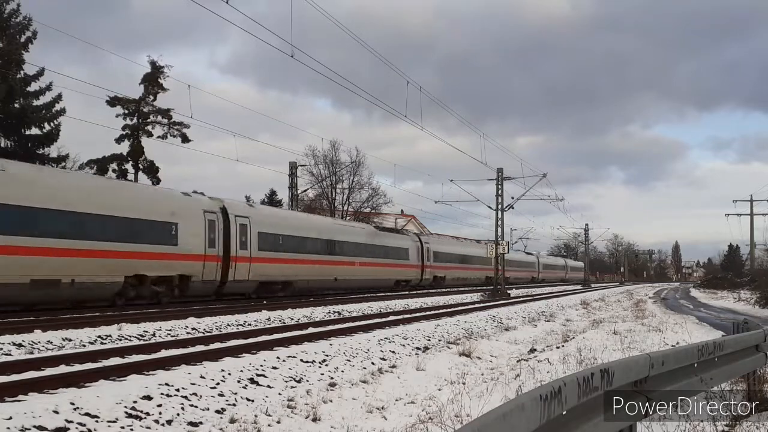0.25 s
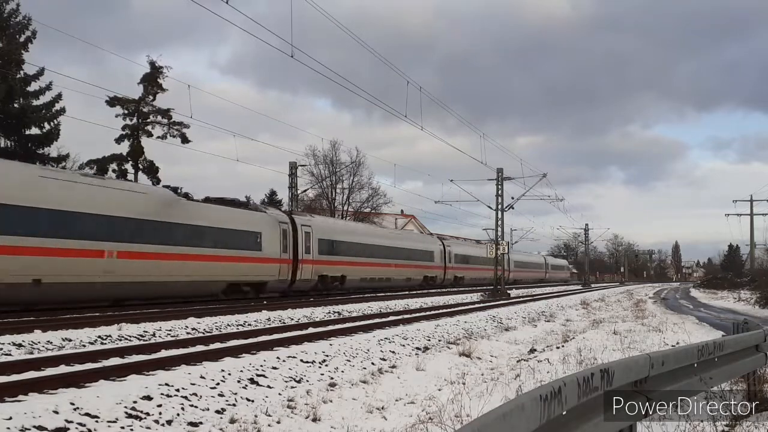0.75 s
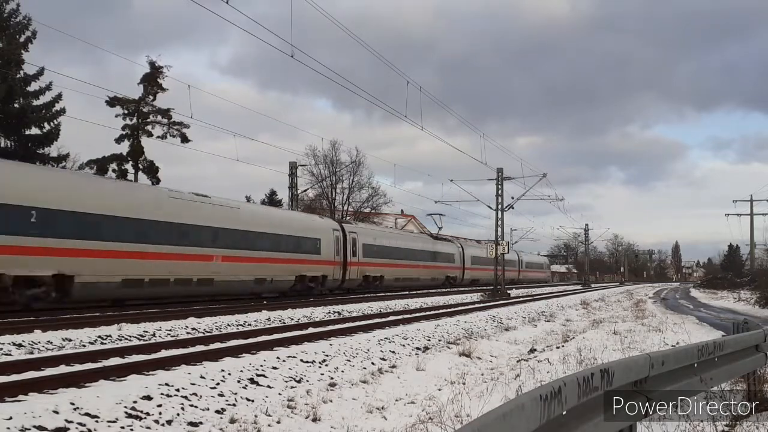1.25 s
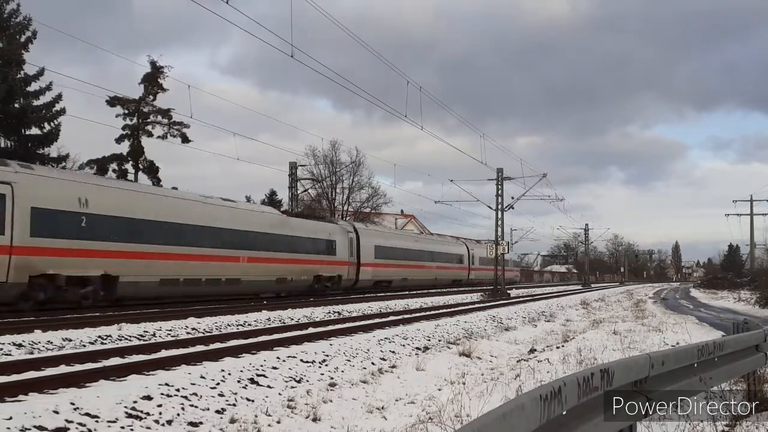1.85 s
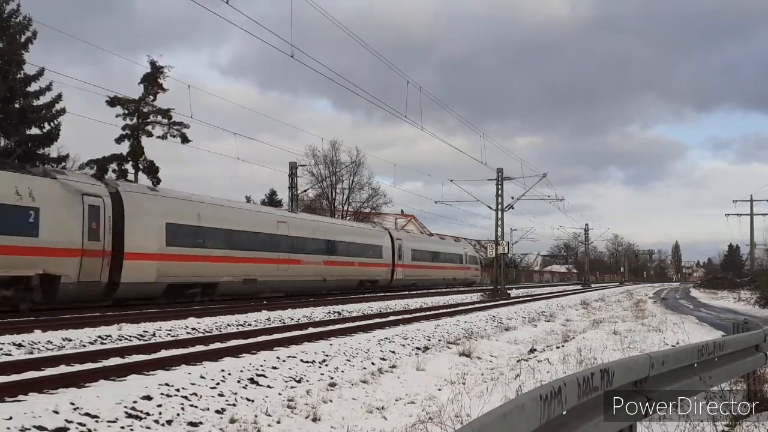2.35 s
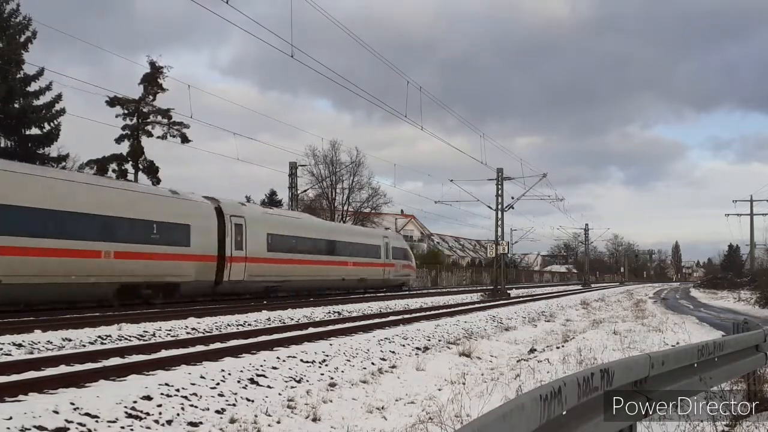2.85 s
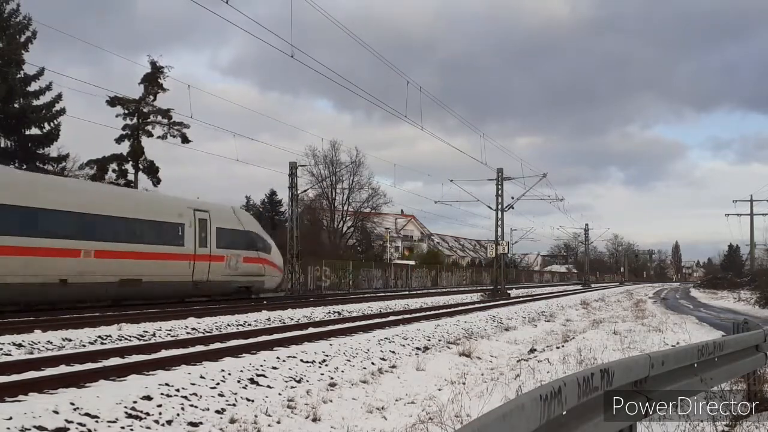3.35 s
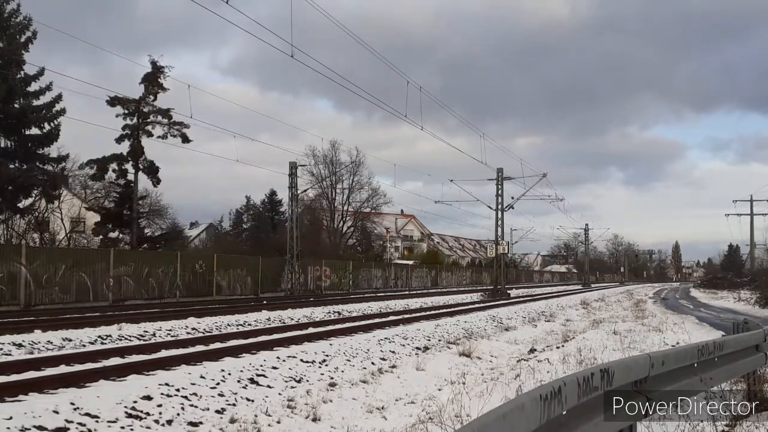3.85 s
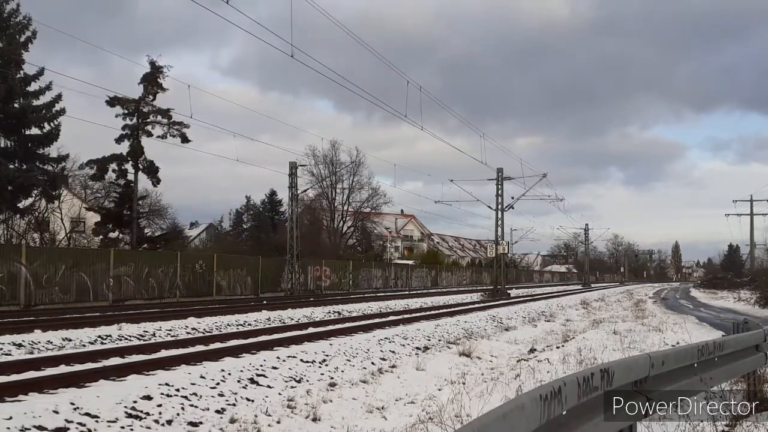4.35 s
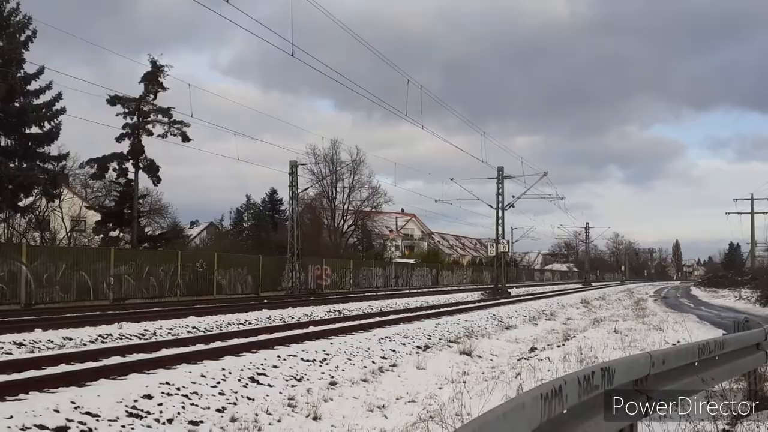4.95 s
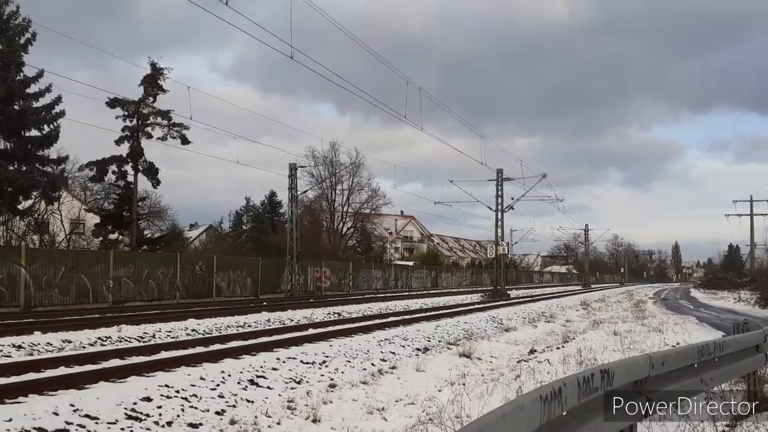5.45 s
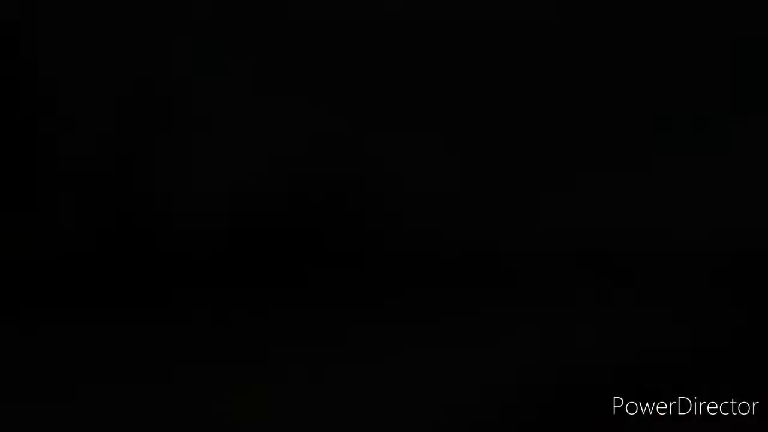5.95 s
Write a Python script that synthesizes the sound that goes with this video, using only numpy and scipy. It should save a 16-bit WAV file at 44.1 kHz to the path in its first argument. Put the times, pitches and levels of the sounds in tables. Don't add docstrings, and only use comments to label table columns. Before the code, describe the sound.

A fast passenger train roars past close by on outdoor tracks, wheels ringing, then its rush drops away into wind thumps and brief silence.

```python
import sys
import numpy as np
from scipy import signal
from scipy.io import wavfile
from scipy.ndimage import uniform_filter1d

SR = 44100
rng = np.random.default_rng(int(sys.argv[2]) if len(sys.argv) > 2 else 0)


def volts_from_db(level):
    exponent = np.asarray(level, float) / 20
    return 10 ** exponent


def persist_wave(psi):
    counts = np.round(np.clip(psi, -1, 1) * 32767).astype(np.int16)
    wavfile.write(sys.argv[1], SR, np.atleast_2d(counts).T)


N = 273728
FRAME, HOP = 2048, 512
HZ = np.fft.rfftfreq(FRAME, 1 / SR)[:, None]
TIMES = (np.arange(N // HOP + 9) - 3) * HOP / SR
PORT_LAG_S = 22 / SR
CUT_S, RESUME_S, END_S = 5.9128, 6.0664, 6.2068


def evened(x):
    return x / np.sqrt(np.mean(x ** 2) + 1e-20)


def over_hz(table):
    hz, *columns = np.transpose(table)
    return np.array([np.interp(np.log(HZ + 1), np.log(hz + 1), c) for c in columns])


def over_time(table):
    s, *columns = np.transpose(table)
    return np.array([np.interp(TIMES, s, c) for c in columns])


def bump(hz, width_hz):
    return np.exp(-.5 * ((HZ - hz) / width_hz) ** 2)


def swells(events, width_s):
    return sum(db * np.exp(-.5 * ((TIMES - s) / width_s) ** 2) for s, db in events)


def two_ports(level_db, alike, lead, steady=.95):
    a, b, c, d = rng.standard_normal((len(TIMES), len(HZ), 4)).T
    alike = np.clip(alike, 0, 1)
    left = a + 1j * b
    lumps = uniform_filter1d(abs(left) ** 2 / 2, size=5, axis=0)
    lumps = uniform_filter1d(lumps, size=7, axis=1)
    left = left / lumps ** (steady / 2)
    right = alike * left + np.sqrt(1 - alike ** 2) * (c + 1j * d)
    right = right * np.exp(-1j * lead)
    spectra = np.array([left, right]) * volts_from_db(level_db) * np.sqrt(SR / FRAME * .6)
    sound = signal.istft(spectra, nperseg=FRAME, noverlap=FRAME - HOP)[1]
    return sound[:, 3 * HOP:][:, :N]


LAYER_EDGES_HZ = [20, 170, 520, 3500, 15500]
# time_s, remoteness [0-1]
REMOTENESS = [(0, 0.12), (4.0, 0.1), (4.5, 0.04), (5.0, 0.49), (5.4, 0.85), (6.0, 0.93)]
# frequency_hz, near [0-1], far [0-1]
PORT_LIKENESS = [(60, 1, 0.84), (350, 0.88, 0.99), (686, 0.81, 0.33), (1390, 0.83, 0.46), (2170, 0.5, 0.3),
                 (3980, 0.32, 0), (8000, 0.22, 0.8), (15000, 0.2, .3)]
# frequency_hz, lead_rad
FAR_LEAD = [(0, -0.5), (1380, 3.5), (1720, 0), (3270, 11), (4050, 11), (7240, 24.5), (9470, 22.5),
            (15100, 47)]
# centre_hz, width_hz, readiness_near, readiness_far [standard deviations]
WEAK_BANDS = [(8800, 500, 2.1, 3.7), (10200, 600, 1.2, 3.), (4600, 300, .8, 2.4), (6700, 200, 1.2, 1.8)]


def train(patchy_db=1.16, flicker_db=0.74, fizz_db=0.5):
    remote = np.clip(over_time(REMOTENESS)[0], 0, 1)
    colour = colour_db(remote)
    layers = [(HZ >= lo) & (HZ < hi) for lo, hi in zip(LAYER_EDGES_HZ, LAYER_EDGES_HZ[1:])]
    held_db = [10 * np.log10((volts_from_db(colour[0]) ** 2 * k).sum(0) * SR / FRAME) for k in layers]
    lift_db = sum(k * (want - held) for k, want, held in zip(layers, layer_db(), held_db))
    lift_db = uniform_filter1d(lift_db, size=5, axis=0)

    patches = rng.standard_normal((len(TIMES), len(HZ))).T
    patches = uniform_filter1d(patches, size=14, axis=0)
    patches = evened(uniform_filter1d(patches, size=7, axis=1))
    flicker = evened(uniform_filter1d(rng.standard_normal(len(TIMES)), size=3))
    flicker = flicker * (flicker_db + fizz_db * remote * (HZ > 9000))

    comb_db = echo_db()
    level_db = colour + lift_db
    level_db = level_db + patchy_db * patches * HZ / (HZ + 500) + flicker * HZ / (HZ + 400)
    level_db = level_db + np.array([0.42 * comb_db, comb_db])

    waver = np.repeat(rng.standard_normal(len(TIMES)), 2)[:len(TIMES)]
    edge_hz = LAYER_EDGES_HZ[-1] - 250 + 130 * waver
    level_db = np.where(HZ < np.minimum(edge_hz, LAYER_EDGES_HZ[-1]), level_db, -140)
    weak = sum(bump(hz, width) * (near + (far - near) * remote) for hz, width, near, far in WEAK_BANDS)
    level_db = level_db - 30 * (patches - weak < -3.6)

    near, far = over_hz(PORT_LIKENESS)
    near_lead = 2 * np.pi * HZ * PORT_LAG_S
    lead = (1 - remote) * near_lead + remote * np.interp(HZ, *np.transpose(FAR_LEAD))
    return two_ports(level_db, (1 - remote) * near + remote * far, lead)


# time_s, lift_db
BOGIES = [(.1, 0.5), (.5, 1), (1.1, 0.5), (1.45, 0.7), (1.82, 2.5), (2.36, 2), (2.85, 1.2), (3.1, 1),
          (3.42, 0.2), (3.7, 2), (4.13, 1), (4.35, 0.5)]


def bogie_lift_db():
    return swells(BOGIES, 0.075)


# near_db, sag_db_per_s, share of distance loss [ratio]
LAYERS = [
    (-21.5, -1., 1.04),
    (-25, -.5, 1.21),
    (-19, -0.1871, 1.044),
    (-30.5, -0.38, 1.08),
]
# time_s, lift_db
BUFFETS = [(.18, 3), (.31, 2.5), (.54, 0.5), (.87, 4.5), (1.04, 4.5), (1.45, 3.5), (1.79, 3.5),
           (2.16, -0.5), (2.8, 2.5), (3.04, 2.5), (3.55, 0.5), (3.86, 3.5), (4.15, 3), (4.37, 2), (4.66, 4),
           (5.02, 2), (5.27, 2.5), (5.5, 5), (5.68, 3), (5.88, 4.5)]
# time_s, lift_db
AXLE_LOADS = [(.4, 0.5), (1.2, 1), (1.5, 1.5), (1.8, 2.5), (2.25, 3.5), (2.5, 4.5), (2.8, 3.5), (3.15, 2.5),
              (3.5, 1.5), (4.02, 2.5), (4.35, -2), (4.62, 2)]


def layer_db(tail_s=4.225, speed_m_s=39.5, distance_m=15.55, hiss_early_s=0.17):
    early_s = np.array([[0], [0], [0], [hiss_early_s]])
    away_m = speed_m_s * np.maximum(TIMES - tail_s + early_s, 0)
    loss_db = 10 * np.log10(1 + (away_m / distance_m) ** 2)
    bogies = bogie_lift_db()
    lifts = [swells(BUFFETS, 0.033), swells(AXLE_LOADS, 0.1), bogies, 0.47 * bogies]
    return [db + sag * TIMES - share * loss + lift
            for (db, sag, share), loss, lift in zip(LAYERS, loss_db, lifts)]


# frequency_hz, left_db_per_hz, right_db_per_hz
NEAR_COLOUR = [(68, -48, -42.5), (108, -46, -43.5), (176, -60.5, -54), (330, -49.5, -45.5),
               (595, -57, -54.5), (840, -52.5, -49.5), (1460, -54, -52), (2165, -56.5, -54),
               (2900, -59.5, -57.5), (3800, -66, -64), (6340, -70.5, -67.5), (8300, -73, -71),
               (12300, -75.5, -91), (15000, -81, -87)]
# frequency_hz, left_db_per_hz, right_db_per_hz
FAR_COLOUR = [(65.5, -59, -49), (110, -55, -61), (187, -74.5, -75.5), (330, -65.5, -61.5), (584, -70, -70),
              (870, -61.5, -63.5), (1480, -67, -65), (2200, -75, -68), (2900, -74.5, -69),
              (3830, -78.5, -84.5), (6250, -93.5, -81.5), (8300, -92.5, -87.5), (12500, -88, -93.5),
              (15000, -84, -102.7)]
# time_s, pitch_hz, level_db over its surroundings
BOOM = [(0, 330, -6.5), (1.2, 350, 3), (2.3, 340, 4), (3.1, 310, 6), (3.9, 324, 6), (4.45, 270, 8.5),
        (4.6, 330, 7.5), (5.0, 330, -3.5)]
# time_s, centre_hz, level_db over its surroundings
ROAR = [(0.0, 1850, 5), (0.25, 2080, 1.5), (0.52, 1580, 7.5), (0.8, 1750, 3), (1.1, 1660, 6.5),
        (1.45, 1900, 2.5), (1.94, 1614, 5), (2.1, 1760, 0.5), (2.6, 1560, 5), (2.76, 1800, 1.5),
        (3.12, 1530, 3.5), (3.37, 2000, 6.5), (3.84, 1800, 6.5), (4.16, 2170, 4.5), (4.24, 1590, 5),
        (4.81, 1970, 8), (5.35, 1950, 3), (5.7, 1510, 3.5)]
# centre_hz, width_hz, level_db
BODY = [(80, 16, 2.5), (420, 14, -5), (455, 16, 2)]
# centre_hz, width_hz, level_db over the roar
RAILS = [(1210, 36, 8), (1420, 100, 8), (1884, 29, 9.5), (2320, 74, 4), (5680, 120, 2.5), (7273, 110, 4),
         (12400, 500, 7.5)]
# centre_hz, half_width_hz, left_db, right_db
HOUSING = [(10020, 1250, -3.5, -33)]


def colour_db(remote, roar_width_hz=300, rails_left=0.72, bogie_focus=1.46):
    colour = (1 - remote) * over_hz(NEAR_COLOUR) + remote * over_hz(FAR_COLOUR)
    boom_hz, boom_db = over_time(BOOM)
    roar_hz, roar_db = over_time(ROAR)
    roar_db = roar_db + bogie_focus * bogie_lift_db()
    colour += boom_db * bump(boom_hz, 22)
    colour += roar_db * bump(roar_hz, roar_width_hz)
    colour += sum(db * bump(hz, width) for hz, width, db in BODY)
    rails = remote * sum(db * bump(hz, width) for hz, width, db in RAILS)
    colour += np.array([rails_left * rails, rails])
    for hz, width, left_db, right_db in HOUSING:
        colour += np.array([left_db, right_db])[:, None, None] / (1 + ((HZ - hz) / width) ** 6)
    return colour


# time_s, extra_path_m, strength [0-1]
ECHO = [(3.8, 0.63, 0.17), (4.05, 0.4, 0.2), (4.25, 0.21, 0.33), (4.45, 0.16, 0), (4.7, 0.13, 0.26)]


def echo_db():
    path_m, strength = over_time(ECHO)
    strength = np.clip(strength, 0, .9) * HZ / (HZ + 600)
    phase = 2 * np.pi * HZ * path_m / 343
    power = 1 + strength ** 2 + 2 * strength * np.cos(phase)
    return 10 * np.log10(power / (1 + strength ** 2))


# start_s, length_s, start_hz, end_hz,
# level_db
RINGS = [(0.301, 0.36, 1678, 1487, -32), (.32, 0.17, 3130, 3130, -29), (0.513, 0.16, 2970, 2930, -34.5),
         (0.98, 0.11, 2950, 2900, -52), (1.695, 0.14, 2950, 2900, -53.5), (1.837, 0.18, 2880, 2950, -41),
         (2.24, 0.21, 2940, 2900, -48), (2.413, 0.089, 3000, 2900, -43), (2.773, 0.16, 1585, 1560, -39),
         (2.802, .12, 3130, 3020, -42), (2.916, .12, 2804, 2930, -36), (3.2, 0.1, 1880, 1833, -38),
         (4.054, 0.17, 2216, 2330, -34.5), (4.522, 0.21, 469, 437, -36), (3.898, 0.621, 325, 274, -34)]


def wheels(waver_rad=.8, right_db=2.):
    out = np.zeros(N)
    for s, length, start_hz, end_hz, db in RINGS:
        n = int(length * SR)
        wobble = evened(uniform_filter1d(rng.standard_normal(SR), size=900))[:n]
        phase = 2 * np.pi * np.cumsum(np.linspace(start_hz, end_hz, n)) / SR + waver_rad * wobble
        out[round(s * SR):][:n] += volts_from_db(db) * 2 * np.hanning(n) * np.sin(phase)
    return np.array([out, volts_from_db(right_db) * np.roll(out, round(PORT_LAG_S * SR))])


def wake_eddies(start_s=4.74, end_s=5.03, level_db=-19.5, pitch_hz=110, per_s=55, spread_db=1.5):
    at, size, pitch = rng.standard_normal((40, 3)).T
    at = start_s + (np.arange(40) + .25 * at) / per_s
    return [(s, level_db + spread_db * a, pitch_hz * np.exp(0.23 * b))
            for s, a, b in zip(at, size, pitch) if s < end_s]


# time_s, level_db, pitch_hz
RIGHT_GUSTS = [(3.76, -16, 170), (3.803, -13, 200), (3.845, -15, 209), (3.9, -15, 146), (4.129, -21, 213),
               (4.148, -13, 218), (4.18, -15, 105), (4.263, -19, 146), (4.767, -23, 133), (4.811, -21, 140),
               (4.840, -6.5, 302), (4.851, -11, 250), (4.861, -7.5, 274), (4.868, -12, 131),
               (4.881, -17, 129), (4.893, -10, 124), (4.914, -9.5, 163.8), (4.942, -11, 167),
               (5.027, -16, 171.4), (5.041, -10.5, 130), (5.038, -18, 330), (5.058, -17, 290),
               (5.066, -19, 290), (5.265, -28, 100)]
# time_s, level_db, pitch_hz
LEFT_GUSTS = [(5.858, -30, 70), (5.872, -22, 90), (5.886, -27, 90), (5.902, -30, 70)]


def slipstream(cycles=2.3, spread=0.15, port_hz=430):
    out = np.zeros((2, N))
    eddies = [(0, *gust) for gust in LEFT_GUSTS]
    eddies += [(1, *gust) for gust in RIGHT_GUSTS + wake_eddies()]
    chance = rng.standard_normal((80, 4))
    t = np.arange(-2000, 2000) / SR
    for (port, s, db, hz), (phase, glide, phase2, detune) in zip(eddies, chance):
        shape = np.exp(-.5 * (t * hz * 5 / cycles) ** 2)
        push = np.sin(2 * np.pi * hz * t * (1 + spread * glide * hz * t / cycles) + 3 * phase)
        push += 0.22 * np.sin(2 * np.pi * hz * (2.33 + 0.14 * detune) * t + 3 * phase2)
        part = out[port, round(s * SR) - 2000:][:4000]
        part += (volts_from_db(db + 1.5) * shape * push)[:len(part)]
    return signal.sosfilt(signal.butter(N=3, Wn=port_hz, fs=SR, output="sos"), out)


# frequency_hz, left_db_per_hz, right_db_per_hz
QUIET_COLOUR = [(40, -72, -75), (109, -77, -61.5), (200, -70, -69), (340, -66, -59), (605, -70, -71.5),
                (1100, -77, -73.5), (1800, -86.6, -83), (2500, -103.2, -94), (4700, -103.5, -100.4),
                (5830, -103.7, -93.5), (9000, -105.6, -106.3), (14800, -109.1, -107.4)]


def quiet_air(rise_db=2, rustle_db=8, level_db=1):
    swell = rise_db * np.clip((TIMES - 6.11) / 0.037, 0, 1)
    burst = rustle_db * np.exp(-.5 * ((TIMES - 6.177) / .016) ** 2)
    rustle = burst * np.array([0.28 * (HZ > 2200) + bump(4300, 450), (HZ > 2200) * 1.0])
    alike = 0.87 * bump(350, 300) + 0.19
    air_db = over_hz(QUIET_COLOUR) + level_db + swell + rustle - 30 * (HZ > LAYER_EDGES_HZ[-1])
    return two_ports(air_db, alike, 2 * np.pi * HZ * PORT_LAG_S * 0.81)


def scene(low_hz=60):
    t = np.arange(N) / SR
    wind_filter = signal.butter(N=5, Wn=low_hz, btype="high", fs=SR, output="sos")
    passing = signal.sosfilt(wind_filter, train() + wheels() + slipstream())
    return np.where(t < (CUT_S + RESUME_S) / 2, passing, quiet_air())


def low_pass(x):
    return signal.sosfilt(signal.butter(12, 15540, fs=SR, output="sos"), x)


def record(dry):
    t = np.arange(N) / SR
    audible = (t < CUT_S) | (t > RESUME_S) & (t < END_S)
    return low_pass(dry * audible)


dry = scene()
out = record(dry)
persist_wave(out)
```